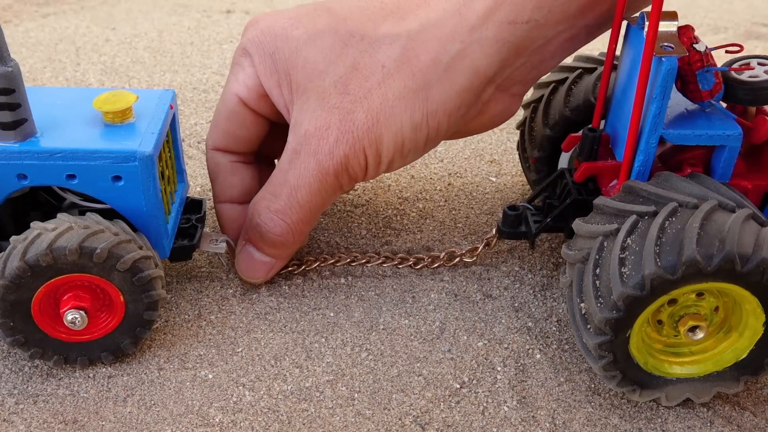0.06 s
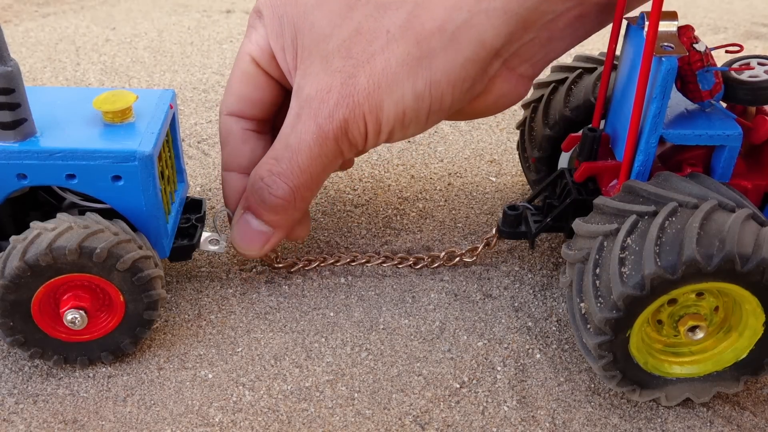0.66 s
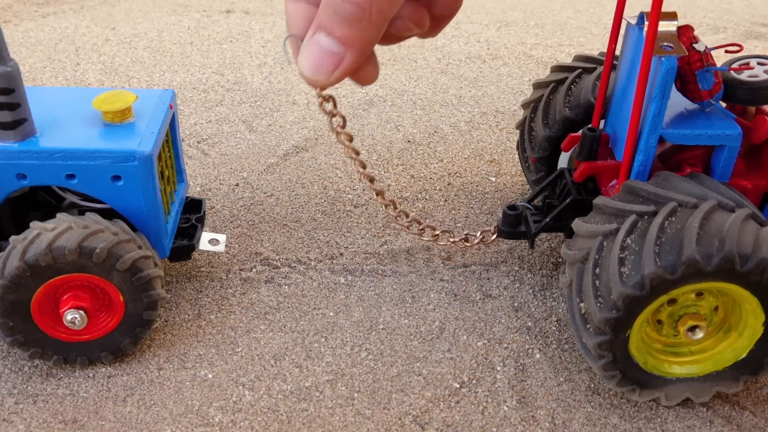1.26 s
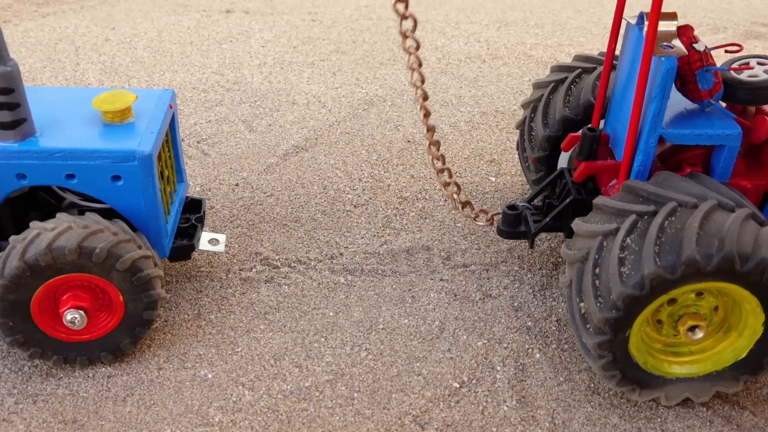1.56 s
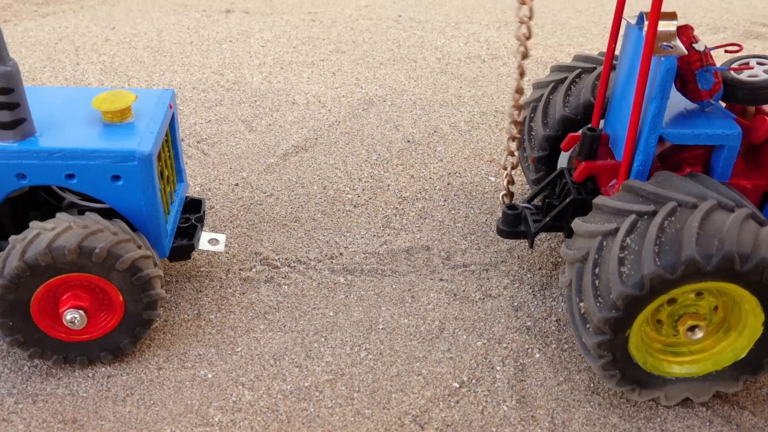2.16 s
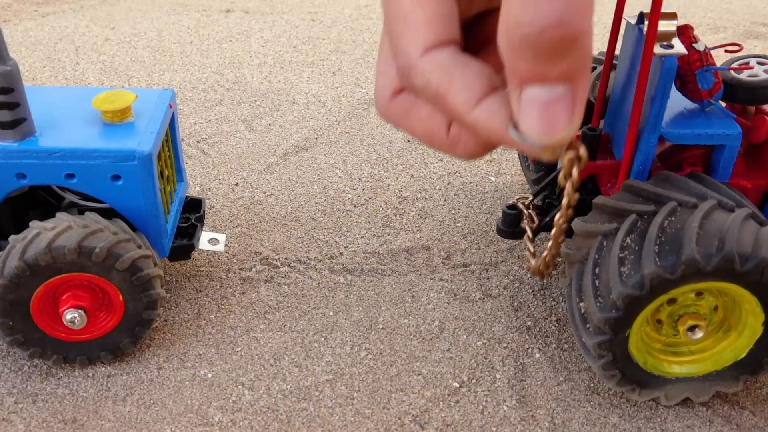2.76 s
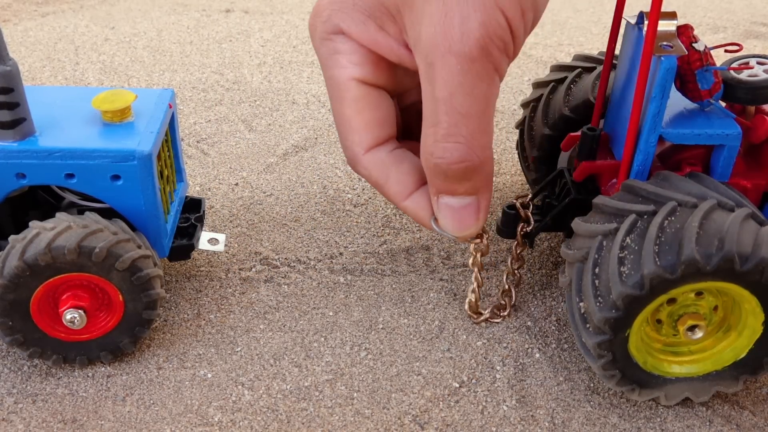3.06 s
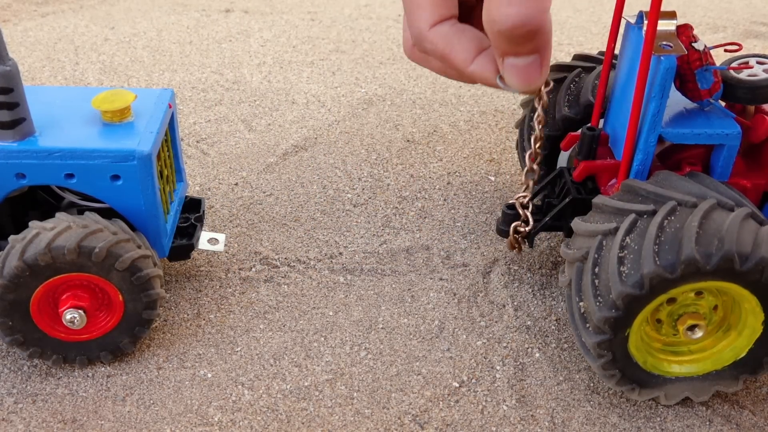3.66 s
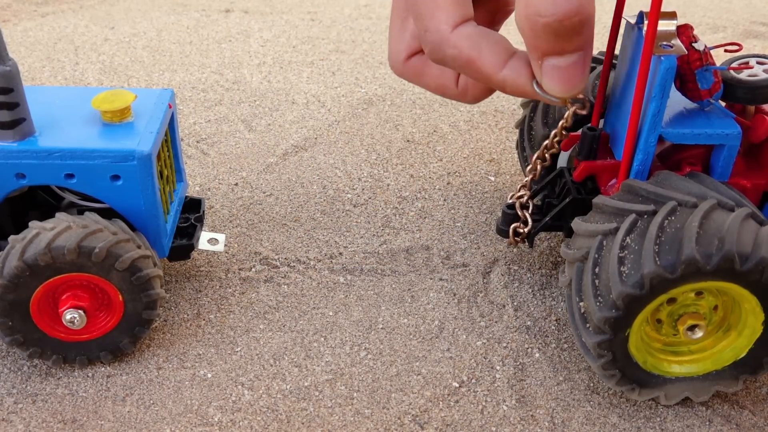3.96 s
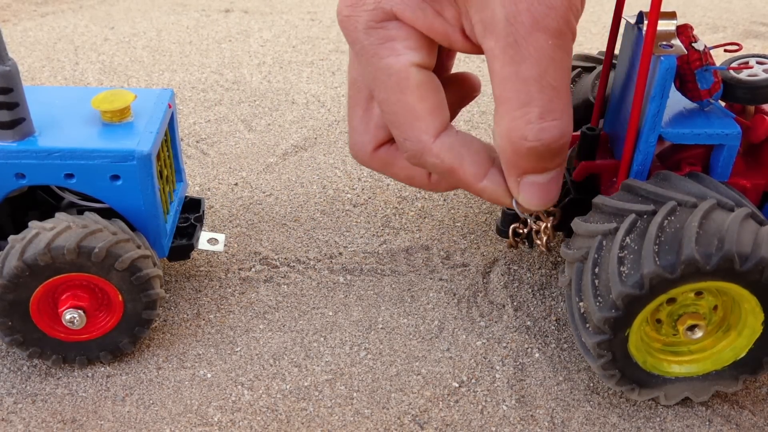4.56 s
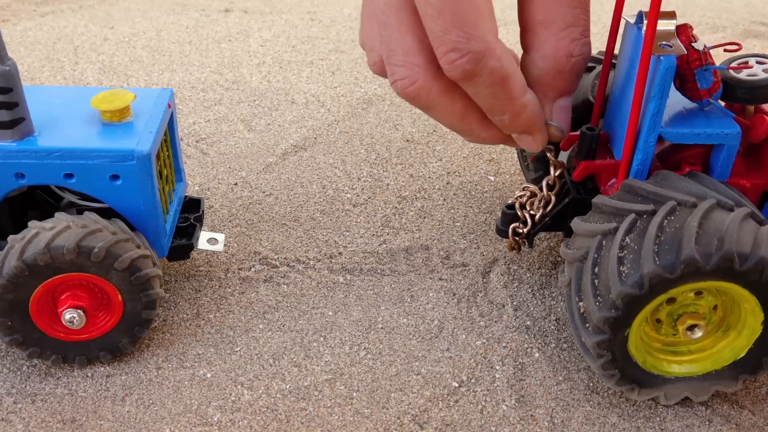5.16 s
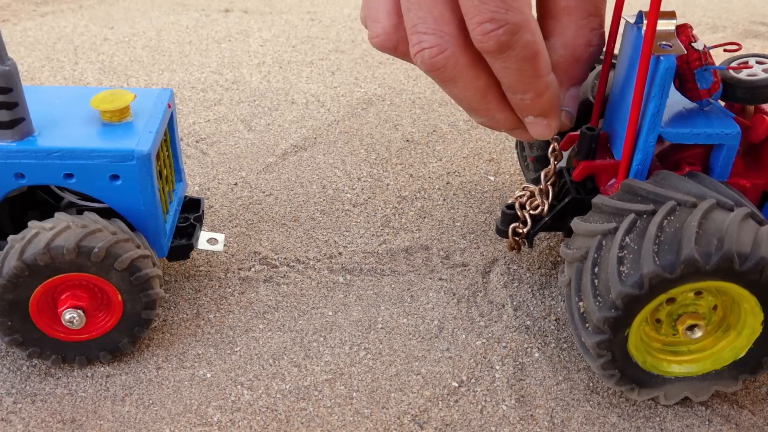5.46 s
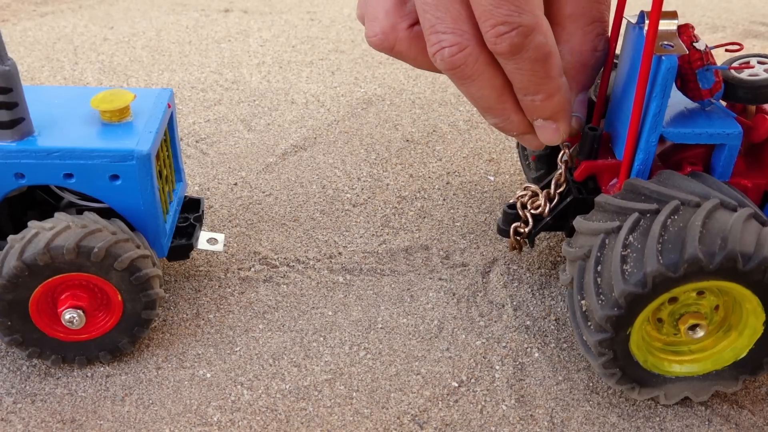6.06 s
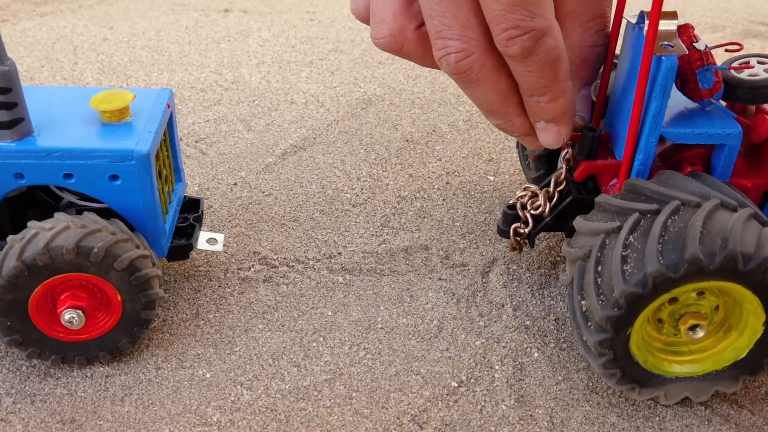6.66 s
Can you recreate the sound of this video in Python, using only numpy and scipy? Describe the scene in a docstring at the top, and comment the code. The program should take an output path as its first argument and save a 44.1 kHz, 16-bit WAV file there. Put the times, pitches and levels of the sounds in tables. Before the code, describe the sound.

Light, high jingling of a little chain being handled, stopping and starting, while birds chirp and trill softly in the background.

```python
"""Quiet outdoor air and a mains hum are there from the start, and small birds sing in the yard.
Almost at once, close by, a hand lifts a small metal chain off sandy ground: the links rattle, and each
clear clink is a sharp tick that sets a link ringing very high. The larger end ring joins in, lower.
From about 1.5 seconds the birds add trills. The chain is wound round the plastic hitch of a toy tractor,
which knocks three times between 3 and 5.1 seconds; the clinks then go on more softly to the end."""
import sys
import numpy as np
from scipy import signal
from scipy.fft import rfft, irfft
from scipy.io import wavfile
from scipy.ndimage import uniform_filter1d, minimum_filter1d

SR = 44100
rng = np.random.default_rng(int(sys.argv[2]) if len(sys.argv) > 2 else 0)


def wav_out(sig):
    """Save sig, one row per channel (or a flat mono array), as 16-bit PCM at SR to the path in sys.argv[1]."""
    wavfile.write(sys.argv[1], SR, np.round(np.clip(np.atleast_2d(sig).T, -1, 1) * 32767).astype(np.int16))


N = 300762
TIME = np.arange(N) / SR
RING_TIME = TIME[:SR // 3]


def from_db(db):
    return 10 ** (np.asarray(db) / 20)


def at_hz(points, hz):
    """Reads a curve between its rows of (frequency, value)."""
    point_hz, values = np.transpose(points)
    return np.interp(np.log(hz + 1), np.log(point_hz), values)


def add(track, start_s, sound):
    """Mixes a sound into a track."""
    i = max(round(start_s * SR), 0)
    track[i:i + len(sound)] += sound[:max(len(track) - i, 0)]


# The tone colour of the air. Each row: frequency in Hz, relative level in dB.
AIR_COLOUR = [(15, -33.5), (25, -11.5), (66, -12), (134, -8), (175, -14), (962, -16), (2280, -16),
              (3160, -12.5), (3520, -13.5), (4140, -17.5), (5000, -22), (13200, -36.5), (16000, -30)]
# How alike the air is at the two ears. Each row: frequency in Hz, likeness from 0 to 1.
EAR_LIKENESS = [(60, 0.88), (250, 0.68), (700, 0.13), (3000, 0), (7000, 0.06), (9000, 0.83)]


def air(level_db=-57.5):
    """Outdoor air is a steady, wide noise, partly shared by both ears."""
    hz = np.fft.rfftfreq(N, 1 / SR)
    alike = np.clip(at_hz(EAR_LIKENESS, hz), 0, 1)
    shared, opposite = rfft(rng.standard_normal((2, N))) * from_db(at_hz(AIR_COLOUR, hz))
    noise = irfft(np.sqrt(1 + alike) * shared + np.sqrt(1 - alike) * opposite * [[1], [-1]], N)
    return from_db(level_db) * noise / np.sqrt(np.mean(noise ** 2))


# How the hum wavers. Each row: time in seconds, level in dB.
HUM_LEVELS = [(0.0, -59), (0.23, -67), (0.38, -52.5), (1.42, -52), (2.49, -61.5), (2.71, -53),
              (2.83, -63.5), (3.21, -54), (3.46, -61.5), (4.21, -54.5), (4.5, -61), (5.32, -54.5),
              (5.62, -65.5), (5.79, -55), (6.61, -59.5), (6.82, -58)]
# The tones in the hum. Each row: multiple of the mains frequency, relative level in dB.
HUM_HARMONICS = [(1, -1), (2, -12), (3, -33), (5, -21.5)]


def hum(mains_hz=60.15, gain_db=1.5):
    """The mains hum is a low tone with a few overtones; its level wavers."""
    tone = sum(from_db(db) * np.sin(2 * np.pi * (multiple * mains_hz * TIME + rng.random()))
               for multiple, db in HUM_HARMONICS)
    level_db = np.interp(TIME, *np.transpose(HUM_LEVELS))
    return np.sqrt(2) * from_db(gain_db + level_db) * tone


# Kinds of bird note, by name. Each row: length in seconds, loudest point as a share of the length,
# swell (higher is more peaked), pitches in Hz at even steps.
NOTE_SHAPES = { "up": (0.047, 0.73, 0.73, [4440, 4086, 4204, 4980, 5970]),
               "whistle": (0.085, .55, 0.7, [5650, 5400, 5330]),
               "down": (0.045, 0.22, 0.78, [5050, 5520, 4460, 4100, 3756, 3800, 3470]),
               "slur": (0.078, 0.53, 0.49, [5630, 5350, 4300]),
               "vee": (0.099, 0.52, 1.12, [7930, 7230, 6100, 6900, 7800]),
               "low dip": (0.076, 0.76, 0.51, [3230, 2960, 3023, 3570]),
               "low fall": (.09, 0.75, 0.84, [3200, 3250, 2850]),
               "low rise": (0.089, 0.47, 0.83, [2200, 3400, 3750]),
               "thin": (0.15, 0.21, 0.7, [6980, 7250, 6700]),
               "drop": (0.054, 0.38, 1.7, [2950, 2450, 2180]),
               "arch": (0.071, 0.51, 1.0, [2400, 3700, 3600])}


def bird_note(length, loudest, swell, pitches, waver=0.008, flutter_db=2.0):
    """A bird whistles a pure tone that glides through its pitches, swelling, fluttering and fading."""
    progress = np.linspace(0, 1, int(length * SR))
    pitches = np.array(pitches) * (1 + waver * rng.normal(size=len(pitches)))
    hz = np.interp(progress, np.linspace(0, 1, len(pitches)), pitches)
    hz = uniform_filter1d(hz, len(hz) // len(pitches) // 2, mode="nearest")   # the throat rounds the turns
    level = np.interp(progress, [0, loudest, 1], [0, 1, 0]) ** swell
    flutter = np.interp(progress, np.linspace(0, 1, 10), flutter_db * rng.normal(size=10))
    return level * from_db(flutter) * np.sin(2 * np.pi * np.cumsum(hz) / SR)


# Single bird notes. Each row: start in seconds, kind of note, level in dB.
CHIRPS = [(.06, "low dip", -58.5), (2.009, "thin", -44), (2.22, "whistle", -31.5), (2.54, "low dip", -55.5),
          (2.725, "slur", -43), (2.741, "low dip", -54.5), (2.865, "arch", -45), (3.110, "low fall", -42),
          (3.631, "low fall", -43), (3.684, "up", -40.5), (4.157, "vee", -45), (4.201, "drop", -47),
          (4.864, "thin", -56), (5.56, "thin", -54), (5.762, "arch", -54), (5.894, "slur", -47)]
# Runs of one repeated note. Each row: start in seconds, kind of note, number of notes,
# seconds from note to note, level in dB.
TRILLS = [(1.544, "up", 5, .0913, -34), (2.340, "down", 10, .0652, -35.5), (3.121, "vee", 6, .158, -39.5),
          (3.275, "low dip", 2, .164, -37.5), (3.809, "low rise", 3, .13, -44)]


def near_birds(trill_gain_db=-0.5):
    """The nearer birds sing single chirps and evenly paced trills, each note a little different."""
    out = np.zeros(N)
    for start, shape, db in CHIRPS:
        add(out, start, from_db(db) * bird_note(*NOTE_SHAPES[shape]))
    for start, shape, count, period, db in TRILLS:
        for k in range(count):
            add(out, start + k * period, from_db(db + trill_gain_db) * bird_note(*NOTE_SHAPES[shape]))
    return out


def distant_birds(db=-55, centre_hz=2900, bend=0.14, count=60):
    """Birds farther off chirp softly at random moments."""
    out = np.zeros(N)
    for start in rng.uniform(0, N / SR, count):
        pitches = centre_hz * np.exp(bend * rng.normal(size=3))
        add(out, start, from_db(db) * bird_note(length=0.083, loudest=0.32, swell=0.36, pitches=pitches))
    return out


def coloured(x, spectrum, size=1024):
    """Gives a sound a tone colour without smearing it earlier in time (a minimum-phase filter)."""
    gains = from_db(at_hz(spectrum, np.fft.rfftfreq(size, 1 / SR)))
    cepstrum = irfft(np.log(gains))
    cepstrum[1:size // 2] *= 2
    cepstrum[size // 2 + 1:] = 0
    response = irfft(np.exp(rfft(cepstrum)))
    return signal.oaconvolve(x, response)[:len(x)]


def fade(t, t60):
    """A dying level. Here and below, t60 is the seconds it takes to fall by 60 dB."""
    return np.exp(-np.log(1000) * t / t60)


# The tone colour of metal touching metal. Each row: frequency in Hz, relative level in dB.
TICK_COLOUR = [(300, -30.5), (900, -19.5), (1800, -12), (2600, -7.5), (3800, 1), (5500, 3.5), (8000, 1),
               (10500, -0.5), (15000, -8)]


def tick(chatter=0.09, chatter_t60=0.025, uneven_db=3.0, samples=700):
    """A hard contact is one spike, then brief chatter through the chain; each has its own colour."""
    force = chatter * rng.standard_normal(samples) * fade(TIME[:samples], chatter_t60)
    force[0] = 1
    sound = coloured(force, [(hz, db + uneven_db * rng.normal()) for hz, db in TICK_COLOUR])
    return sound / np.abs(sound).max()


def mode(hz, t60, rise_s=0.00047):
    """A mode is one natural tone of a struck part: it builds while the contact chatters, then dies."""
    envelope = (1 - np.exp(-RING_TIME / rise_s)) * fade(RING_TIME, t60)
    return envelope * np.sin(2 * np.pi * hz * RING_TIME)


# The links' upper tones. Each row: frequency in Hz, relative level in dB.
LINK_UPPER_MODES = [(12750, -8), (13060, 1), (13420, 3), (13560, -1), (13770, -8), (14300, -13),
                    (14560, -32), (14950, -11)]


def link(t60, upper_hz, main_hz=11800, twin_split=0.0057, twin_db=-6, neighbours_db=-12, uneven_db=5):
    """A struck link bends and rings with a main tone and an upper one, returned separately."""
    def twins(hz, life):   # a link is not quite symmetric, so each tone beats with a close twin
        twin_hz = hz * (1 + twin_split * rng.normal())
        return mode(hz, life) + from_db(twin_db) * mode(twin_hz, life)
    main = twins(main_hz * (1 + 0.00294 * rng.normal()), t60)
    upper = twins(upper_hz, t60 * 0.46)
    for k, (hz, db) in enumerate(LINK_UPPER_MODES):   # the link's other upper tones join in more softly
        gain = (-1) ** k * from_db(neighbours_db + db + uneven_db * rng.normal())
        upper += gain * mode(hz * (1 + 0.004 * rng.normal()), t60 * 1.4)
    return main, upper


CALM_DB, BUSY_DB = -61.5, -37   # strength of a slight and of a hard shake
RING_GROWTH = 1.55   # dB of ring per dB of shake: harder contacts ring more than they tick
# Shakes of the chain. Each row: start in seconds, end in seconds, strength in dB,
# damping of the main tone in dB (high when the chain is taut or pinched).
SHAKES = [(0.159, 0.233, -59.5, 16), (0.256, 0.494, -53.5, -8), (0.505, 0.666, -41, 8),
          (0.664, .77, -42, -2), (0.942, 1.011, -39, -3), (1.007, 1.172, -45.5, 3), (1.173, 1.23, -40, -3),
          (1.23, 1.313, -47.5, 9), (1.35, 1.5, -42.5, 0), (1.758, 2.062, -52, 16.5),
          (2.061, 2.29, -47, -0.5), (2.966, 3.148, -38, 1), (3.146, 3.252, -52.5, -3),
          (3.431, 3.75, -49, 14), (3.829, 4.15, -50, 18), (4.304, 4.455, -39.5, 3), (4.452, 4.733, -56, 20),
          (5.05, 5.211, -43, -5.5), (5.242, 5.506, -50, -5), (5.506, 5.748, -59, -6.5),
          (5.951, 6.16, -55, 14), (6.149, 6.34, -41.5, 1), (6.342, 6.419, -55, 7)]
# The faint stirring of the chain while the fingers hold it: one more row of the same kind.
HANDLING = (0.46, 6.5, -64.5, 3)


def rattle(calm_per_s=55, busy_per_s=400, spread_db=5.0, t60=0.12, settle_s=0.012,
           tick_db=2.5, main_db=8.5, upper_db=10.0):
    """Links bump each other at random; a harder shake brings more bumps and more ringing."""
    contacts = np.zeros((len(LINK_UPPER_MODES), 3, N))   # per link: tick, main tone, upper tone
    for start, end, db, damping_db in SHAKES + [HANDLING]:
        per_s = np.interp(db, [CALM_DB, BUSY_DB], [calm_per_s, busy_per_s])
        count = int(max(per_s * (end - start), 2))
        when, softness, which = rng.random((3, 400))[:, :count]
        times = start + (end + 2 * settle_s - start) * when
        force = from_db(spread_db * np.minimum(-np.log(softness), 3))
        force *= np.exp(-np.maximum(times - end, 0) / settle_s)   # links settle after the hand stops
        force *= np.sqrt((end - start) * SR / np.sum(force ** 2))   # bumps share the shake's energy
        ring_db = BUSY_DB + RING_GROWTH * (db - BUSY_DB)
        levels = from_db([db + tick_db, ring_db + main_db - damping_db, ring_db + upper_db])
        at_sample = np.minimum(times * SR, N - 1).astype(int)
        hit_link = (which * len(contacts)).astype(int)
        contacts[hit_link, :, at_sample] = force[:, None] * levels
    out = np.zeros(N)
    for trains, (upper_hz, mode_db) in zip(contacts, LINK_UPPER_MODES):
        sounds = (tick(), *link(t60, upper_hz))
        for train, sound, gain in zip(trains, sounds, (1, 1, from_db(mode_db))):
            out += gain * signal.oaconvolve(train, sound / np.linalg.norm(sound))[:N]
    return out


# The clear clinks. Each row: start in seconds, tick level in dB, main tone level in dB,
# upper tone level in dB, upper tone frequency in Hz.
CLINKS = [(0.2503, -24, -32, -44, 12800), (0.2649, -21.5, -24, -33, 12700),
          (0.3332, -20.5, -34, -31, 12700), (0.5327, -15.5, -28, -37, 12800),
          (0.5444, -20.5, -23, -37, 12900), (0.6329, -16, -34, -39, 12800), (0.6669, -19, -20, -29, 12700),
          (0.687, -8.5, -10.5, -17, 12800), (0.7178, -15, -16, -32, 12700),
          (0.7742, -14.5, -42, -43, 14200), (0.788, -15, -35.5, -27, 12900),
          (0.9652, -16.5, -27, -26, 12800), (0.9775, -17, -19, -24, 12800), (1.0392, -22, -42, -31, 13800),
          (1.1029, -20.5, -35, -27.5, 13100), (1.191, -16, -22, -25, 13400),
          (1.2008, -11, -19.5, -20, 13600), (1.3497, -16.5, -23, -32, 12700),
          (1.4858, -14, -20.5, -25, 13800), (1.5414, -22.5, -26.5, -44, 12700),
          (1.9635, -30, -50, -38, 13600), (2.0764, -12, -45, -26, 13600),
          (2.1884, -16.5, -39.5, -37, 13400), (2.82, -20, -21, -33, 13800),
          (2.9644, -14.5, -28, -26, 13700), (2.9919, -16, -21, -24, 13800),
          (3.0115, -11.5, -16, -24, 12800), (3.1421, -13, -15, -28, 12600), (3.454, -25.5, -36, -33, 13800),
          (3.5397, -22.5, -58, -46, 13800), (3.659, -13.5, -34, -32, 13400),
          (3.8417, -21.5, -37.5, -38, 12600), (3.8861, -23, -36.5, -47, 13500),
          (3.9443, -18.5, -40, -20.5, 13500), (3.9993, -17, -44, -20, 13530),
          (4.1006, -19, -60, -27, 13600), (4.3049, -15, -47, -34, 13400), (4.3601, -9.5, -28, -26, 13700),
          (4.437, -14.5, -14, -19, 13600), (4.6968, -22, -69, -26.5, 13600), (5.074, -9, -18, -32, 12700),
          (5.1064, -10.5, -16.5, -33, 12700), (5.1495, -16.5, -23, -39, 12700), (5.3, -31, -56, -43, 13600),
          (5.4737, -21, -29.5, -37, 12700), (5.6308, -21.5, -49, -37, 13600),
          (6.2262, -27, -22, -33, 12700), (6.3004, -19, -33, -37, 12800), (6.5523, -23, -47, -24.5, 12800),
          (6.6389, -23, -32.5, -39, 13800)]


def clinks(free_t60=0.24, crowded_t60=0.12, tick_gain_db=1.5, main_gain_db=1.0, upper_gain_db=-1.0):
    """Each clear blow ticks and rings a link; in a hard shake its neighbours cut the ringing short."""
    out = np.zeros(N)
    for s, tick_db, main_db, upper_db, upper_hz in CLINKS:
        shake_db = max([CALM_DB] + [db for start, end, db, _ in SHAKES if start <= s < end])
        t60 = np.interp(shake_db, [CALM_DB, BUSY_DB], [free_t60, crowded_t60])
        main, upper = link(t60, upper_hz)
        add(out, s, from_db(tick_db + tick_gain_db) * tick())
        add(out, s, from_db(main_db + main_gain_db) * main)
        add(out, s, from_db(upper_db + upper_gain_db) * upper)
    return out


def struck(blows, modes):
    """A solid part rings with the same tones at every blow."""
    ring = sum(from_db(db) * mode(hz, t60) for hz, db, t60 in modes)
    out = np.zeros(N)
    for start, db in blows:
        add(out, start, from_db(db) * ring)
    return out


# Blows on the end ring. Each row: start in seconds, level in dB.
END_RING_HITS = [(.864, -24), (1.915, -36), (2.076, -28), (2.278, -29.5), (3.069, -26), (4.3493, -17.5),
                 (4.36, -9.5), (5.076, -26)]
# Its tones. Each row: frequency in Hz, relative level in dB, seconds to fade by 60 dB.
END_RING_MODES = [(5480, -12, .03), (7700, 0, .045), (10190, -14, .035)]


def end_ring(tick_gain_db=1.0):
    """The larger ring at the chain's end ticks, clinks lower and dies fast."""
    out = struck(END_RING_HITS, END_RING_MODES)
    for start, db in END_RING_HITS:
        add(out, start, from_db(db + tick_gain_db) * tick())
    return out


# Knocks of the chain on the hitch. Each row: start in seconds, level in dB.
HITCH_KNOCKS = [(3.142, -58), (4.362, -51.5), (5.074, -53)]
# The hitch's tones. Each row: frequency in Hz, relative level in dB, seconds to fade by 60 dB.
HITCH_MODES = [(670, 1.5, 0.038), (920, 2.5, 0.037), (1420, 7, 0.037)]


def hitch():
    """The plastic hitch answers hard blows with a short, hollow knock."""
    return struck(HITCH_KNOCKS, HITCH_MODES)


def reflections(x, t60, dull_hz, gap_s):
    """Sound bounces back after a short gap, different at each ear and without its top treble."""
    t = TIME[:SR]
    echoes = rng.standard_normal((2, SR)) * fade(t, t60) * (t > gap_s)
    echoes /= np.linalg.norm(echoes, axis=1, keepdims=True)
    echoes = signal.sosfilt(signal.butter(6, dull_hz, fs=SR, output="sos"), echoes)
    return signal.oaconvolve(x[None], echoes, axes=1)[:, :N]


def from_left(x, pan_db, lag_s):
    """A sound from the left reaches the right ear later and weaker."""
    delayed = np.interp(TIME - lag_s, TIME, x)
    return np.array([x * from_db(pan_db / 2), delayed * from_db(-pan_db / 2)])


def scene():
    """The near chain reflects off ground, toy and walls; the birds are off to the left and echo."""
    chain = clinks() + end_ring() + hitch() + rattle()
    song, far_song = near_birds(), distant_birds()
    ground = from_db(-3) * reflections(chain, t60=0.08, dull_hz=3640, gap_s=0.0005)
    toy = from_db(-54) * reflections(chain, t60=0.0246, dull_hz=14000, gap_s=0.0005)
    walls = from_db(-15.5) * reflections(chain, t60=0.39, dull_hz=5640, gap_s=0.0034)
    birds = from_left(song, pan_db=6.0, lag_s=2.6e-5)
    birds += from_db(-3.5) * from_left(far_song, pan_db=3.5, lag_s=0.00021)
    bird_echo = from_db(-3.5) * reflections(song + far_song, t60=0.5, dull_hz=6000, gap_s=0.012)
    return chain + ground + toy + walls + birds + bird_echo + hum() + air()


def record(dry, cutoff_hz=15100, ceiling_db=-8.0, hold_s=0.0031):
    """The highest treble is cut steeply, and a fast limiter turns down the sharpest ticks."""
    filtered = signal.sosfilt(signal.ellip(10, 0.3, 80, cutoff_hz, fs=SR, output="sos"), dry)
    window = 2 * int(hold_s * SR / 2) + 1
    peaks = np.abs(filtered).max(axis=0)
    allowed_gain = np.minimum(1, from_db(ceiling_db) / (peaks + 1e-9))
    return filtered * uniform_filter1d(minimum_filter1d(allowed_gain, window), window)


dry = scene()
out = record(dry)
wav_out(out)
```